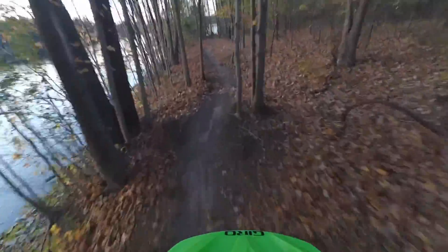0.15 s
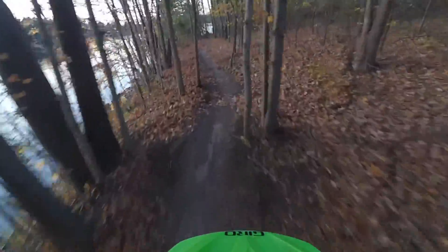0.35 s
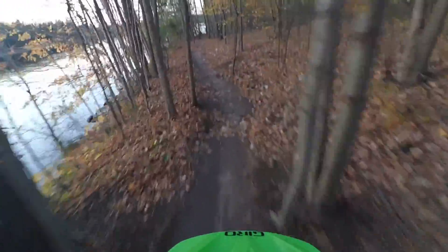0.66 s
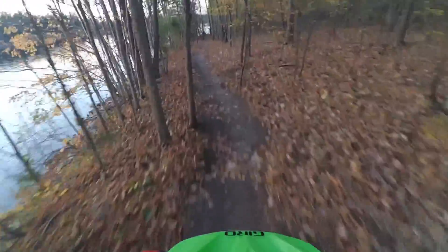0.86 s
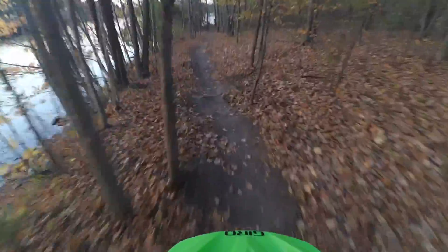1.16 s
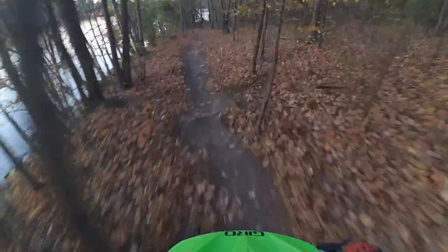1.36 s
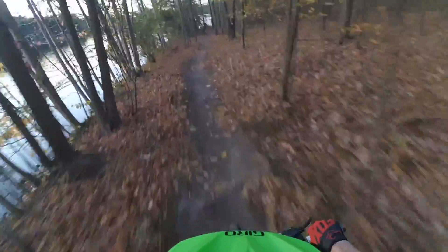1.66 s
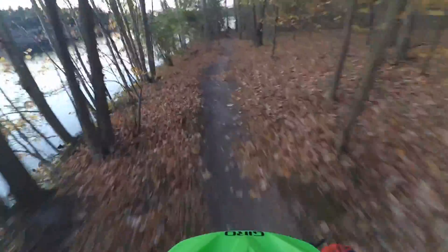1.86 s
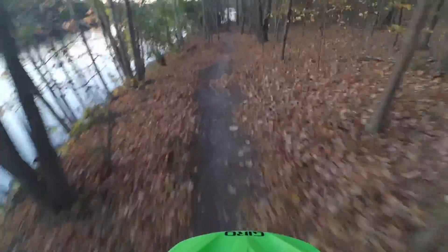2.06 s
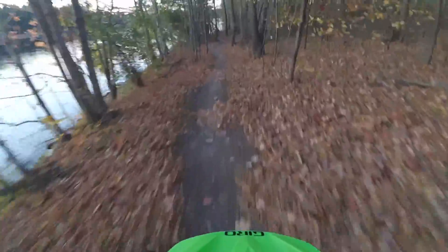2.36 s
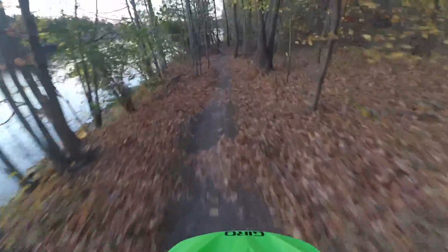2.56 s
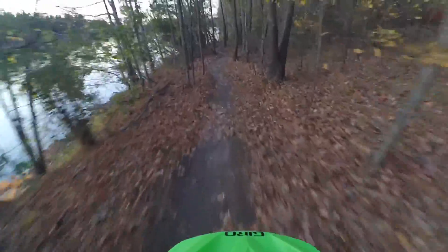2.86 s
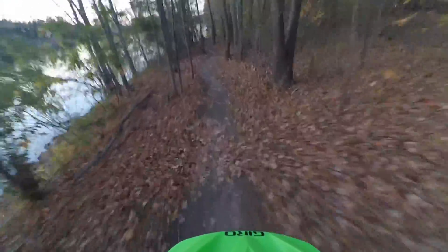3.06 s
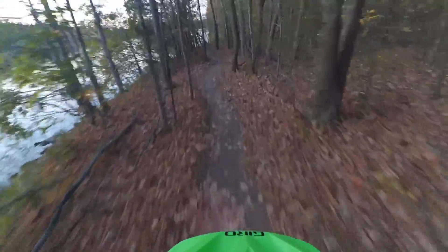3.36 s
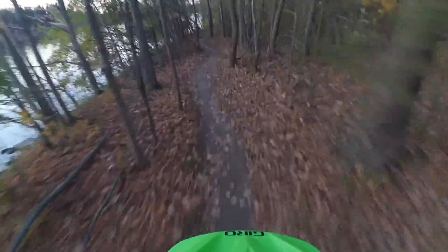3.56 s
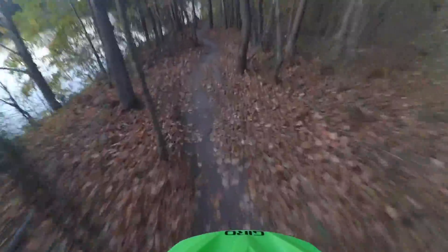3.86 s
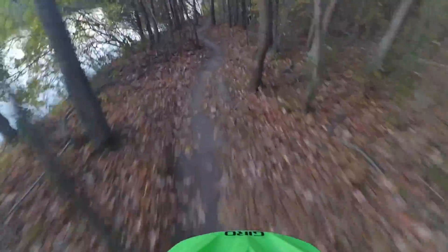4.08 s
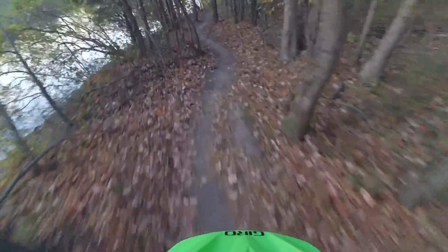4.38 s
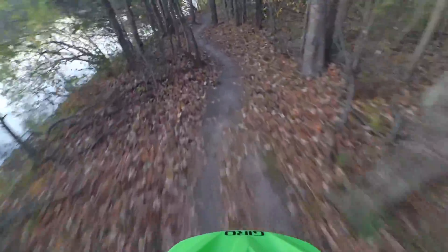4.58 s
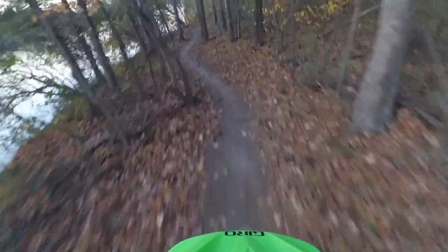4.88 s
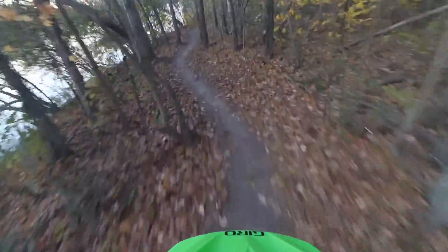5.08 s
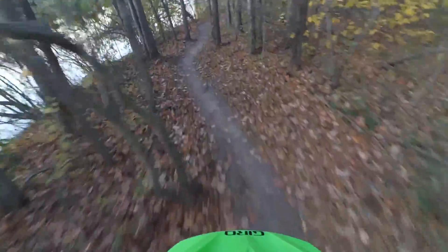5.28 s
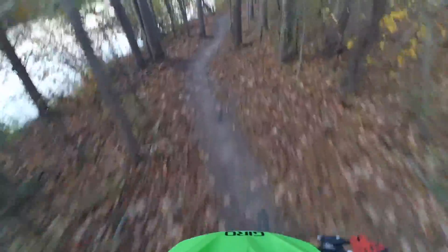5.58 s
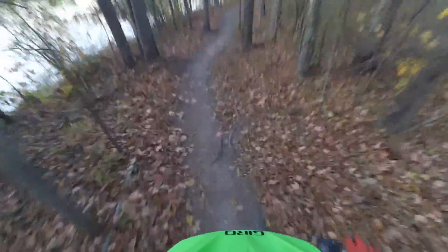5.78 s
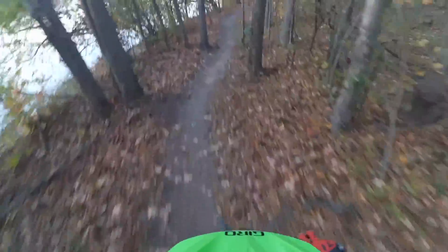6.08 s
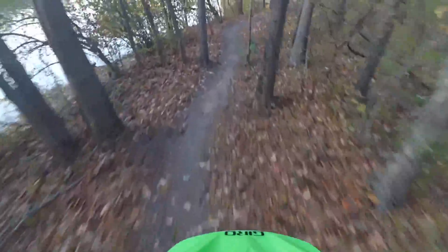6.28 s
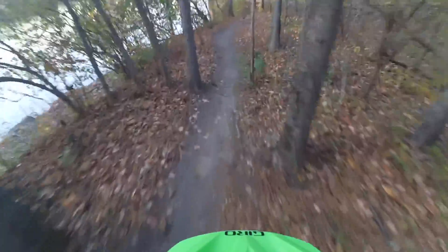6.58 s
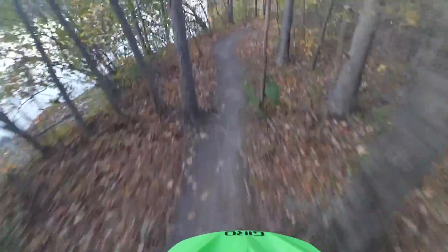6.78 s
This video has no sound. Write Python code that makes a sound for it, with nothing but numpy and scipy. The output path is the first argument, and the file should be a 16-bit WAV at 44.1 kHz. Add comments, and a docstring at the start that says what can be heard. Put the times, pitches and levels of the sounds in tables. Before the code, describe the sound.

A mountain bike rolls fast over a dirt trail, tyres humming and crackling leaves, with rattling bumps, sharp snaps and low wind buffeting the microphone.

```python
"""Knobbly tyres roar and crush dry leaves as a mountain bike runs fast down a dirt trail, heard at the helmet.
Tyres and leaves are filtered noise and tiny cracks; the tyre casings add wavering resonances.
Roots set off short rattles of dull impacts, and sharp snaps are shaped bursts with a faint tail.
Hard bumps push air at the microphone, shake the camera mount with a decaying wobble, and some knock it.
Wind sways and buffets in low filtered noise that grows on rough ground, over a soft even rush of air."""
import sys
import numpy as np
from scipy import signal
from scipy.fft import rfft, irfft, next_fast_len
from scipy.io import wavfile
from scipy.ndimage import uniform_filter1d

SR = 44100
rng = np.random.default_rng(int(sys.argv[2]) if len(sys.argv) > 2 else 0)


def master_out(mix):
    """Clip the mix to full scale and print it as 16-bit PCM to the path in sys.argv[1]."""
    frames = np.transpose(np.atleast_2d(mix))
    ceiling = np.clip(frames, -1, 1)
    pcm = np.round(ceiling * 32767).astype(np.int16)
    wavfile.write(sys.argv[1], SR, pcm)


N = 305613
TIME = np.arange(N) / SR  # s

# rolling, louder with speed and packed ground: start_s [s], rolling_db [dB], rasp_db [dB]
ROLLING = [(0.0, -60, -68), (0.37, -61.5, -69.5), (1.06, -54.5, -62.5), (1.87, -55.5, -63),
           (2.08, -54, -59.5), (2.63, -51.5, -60.5), (3.32, -51.5, -58.5), (3.69, -50.5, -59),
           (4.26, -55, -62.5), (4.44, -58, -64), (4.88, -56, -61.5), (5.36, -62, -64.5),
           (5.85, -59.5, -60.5), (6.06, -66, -69), (6.48, -58.5, -61), (6.93, -68, -70.5)]
# tyre resonances: pitch_hz [Hz], width_hz [Hz], level_db at cruising [dB], slope [dB per dB of rolling]
TYRE_MODES = [(901, 28, -5.5, 1.14), (1193, 96, 0, 1.2), (1348, 50, 3, 1.5), (1584, 120, -14, 0.5)]
# colour of the tyre roar: pitch_hz [Hz], level_db [dB]
ROAR_COLOUR = [(150, -3.5), (300, -11.5), (500, -16.5), (720, -9), (880, -7), (1000, -4.5), (1200, -3),
               (1400, -5.5), (1490, -13), (1640, -4.5), (1900, -22.5), (2300, -22), (5000, -64)]
# colour of the gritty rasp: pitch_hz [Hz], level_db [dB]
RASP_COLOUR = [(1500, -12.5), (2050, -7.5), (2350, 4.5), (2700, 4.5), (2950, -1), (3250, 2.5), (3650, -5),
               (3950, -2.5), (4500, -19), (5100, -14.5), (5600, -13), (6500, -28.5), (10000, -41),
               (16000, -31)]
# drifts of dry leaves: middle_s [s], half_length_s [s], rustle_db [dB]
DRIFTS = [(1.757, 0.14, -84), (2.24, 0.045, -84), (2.95, 0.059, -75), (3.473, 0.1, -79), (4.16, 0.21, -79),
          (4.927, 0.052, -74), (5.33, 0.047, -66.5), (5.567, 0.14, -71.5), (5.867, 0.0078, -57.5),
          (5.934, 0.095, -66.5), (6.061, 0.0072, -59), (6.263, 0.073, -69.5), (6.55, 0.034, -66)]
# colour of the breaking leaves: pitch_hz [Hz], level_db [dB]
LEAF_COLOUR = [(2000, -15), (4000, 7.5), (5600, 6), (7200, 3), (9000, -2), (14500, -8), (16000, -35)]
# rattles and scuffs on rough ground: start_s [s], length_s [s], level_db [dB], treble_lift_db [dB],
# ring_pitch_hz [Hz], ring_db against the chatter [dB]
RATTLES = [(1.568, 0.021, -48.5, -2, 1590, -10), (1.622, 0.018, -44.5, -4.5, 1240, -0.5),
           (1.989, 0.036, -48, -1.5, 1310, -9), (2.038, 0.029, -47.5, -0.5, 1330, -4),
           (2.108, 0.021, -45.5, -10, 1340, -1), (2.15, 0.038, -47.5, -2.5, 1230, -4),
           (2.217, 0.044, -45.5, 2, 1240, -8), (2.57, 0.024, -48, -7, 1120, 4.5),
           (3.093, 0.021, -47, -6, 1670, -1), (3.144, .028, -47, -1.5, 1280, -5),
           (3.201, 0.033, -43.5, 2.5, 1650, -5), (3.587, .023, -48.5, -1, 1330, -8),
           (3.774, 0.046, -51, -0.5, 1320, -16), (3.827, 0.054, -45.5, 0, 1220, -9),
           (3.909, 0.028, -49, -2, 1160, -2), (5.342, 0.015, -52.5, -5, 1240, -1),
           (5.592, 0.029, -49, 0, 1300, -6), (5.633, 0.044, -45, 1.5, 1290, -4),
           (5.691, 0.033, -45.5, -4, 1220, -8.5), (5.818, 0.013, -56, 10, 1640, -8),
           (5.84, 0.029, -45.5, -2, 1240, -3.5), (5.863, .026, -52, -4, 1250, -6),
           (5.9, 0.07, -45.5, 1.5, 1220, -3), (6.003, 0.05, -51.5, 1.5, 1230, -1),
           (6.243, 0.023, -54.5, -5, 1220, -2), (6.443, 0.033, -51, 2.5, 1300, -7),
           (6.472, 0.012, -38.5, 1.5, 1720, -9), (6.506, 0.036, -46, -2, 1150, 0),
           (6.534, 0.041, -45, -0.5, 1230, -2.5)]
# loose parts that ring in a rattle: pitch_hz [Hz], width_hz [Hz], level_db [dB]
LOOSE_PARTS = [(1614, 81, -9.5), (2490, 350, -21), (3810, 230, -10.5)]
# colour of the chatter: pitch_hz [Hz], level_db [dB]
CHATTER_COLOUR = [(240, -43), (450, -7.5), (700, -7), (870, 3), (1050, -3), (1220, 9), (1470, -8.5),
                  (1650, 2), (2050, -6), (2400, 2), (2850, -7.5), (3250, -2), (4000, -12), (4700, -14.5),
                  (6000, -21), (8000, -36), (15000, -36)]
# snaps of twigs and grit against the bike: start_s [s], peak_db [dB], colour_hz [Hz], width_octaves [octaves]
SNAPS = [(1.533, -28, 2640, 0.76), (1.601, -36, 1140, 0.22), (1.719, -57, 5900, .4),
         (1.772, -55, 6000, 0.32), (2.023, -50, 5960, .43), (2.234, -24.5, 2600, 0.82),
         (2.87, -39, 3050, 0.69), (3.028, -33, 2640, 1.2), (3.107, -38, 1800, .28), (3.177, -39, 2600, .4),
         (3.226, -41, 3000, 0.7), (3.231, -48, 3220, .7), (4.25, -50, 6300, 0.36), (5.354, -41, 1250, 0.18),
         (5.851, -40, 3200, 0.45), (5.924, -45, 4200, .9), (5.944, -46, 4350, 0.45), (5.96, -46, 3800, .35),
         (6.029, -48, 3400, .45), (6.059, -48, 6500, 0.39), (6.447, -39, 2600, 0.76),
         (6.479, -43, 3600, 1.4), (6.49, -24.5, 1970, 0.83)]
# bumps in the trail: middle_s [s], push [signed share of full scale], half_length_s [s], shake_db [dB]
BUMPS = [(0.245, -0.17, 0.024, -50), (0.583, -0.25, 0.014, -46), (0.76, 0.41, .016, -40),
         (1.064, -0.093, 0.011, -42), (1.609, -0.48, 0.018, -19.5), (1.98, -0.28, 0.077, -36),
         (2.03, 0.17, 0.0095, -42), (2.084, -0.46, 0.017, -50), (2.213, -0.52, 0.02, -22),
         (2.276, 0.36, 0.012, -54), (2.509, 0.24, 0.014, -45), (3.131, 0.35, 0.012, -27),
         (3.182, -0.56, 0.0084, -14), (3.245, 0.84, 0.016, -36), (3.623, -0.45, .018, -24),
         (3.824, -0.57, 0.016, -15), (3.946, -0.45, 0.015, -25.5), (4.04, 0.24, 0.011, -32),
         (4.128, -0.38, 0.022, -30.5), (4.738, -0.35, .013, -37.5), (5.372, -0.2, 0.017, -26.5),
         (5.631, -0.68, 0.018, -20.5), (5.901, -0.87, 0.013, -13), (6.467, -0.23, 0.0078, -31.5),
         (6.517, -0.82, 0.016, -14.5)]
# colour of the thud in a bump: pitch_hz [Hz], level_db [dB]
THUD_COLOUR = [(30, -6), (48, 0), (80, 0), (100, -15), (125, -31), (175, -34), (330, -45), (1200, -65)]
# dull knocks, mostly of the camera mount, one (3.238 s) as the microphone overloads: start_s [s], level_db
# [dB], pitch_hz [Hz], decay_t60_s [s],
KNOCKS = [(3.175, -30.5, 160, 0.037, -14.5), (3.211, -29, 156, 0.036, -12), (3.238, -30.5, 180, 0.055, -13),
          (5.874, -23.5, 156, 0.014, -14.5), (6.516, -39, 126, 0.042, -23)]
# hollow body of the helmet under a knock: pitch_hz [Hz], level_db [dB]
HELMET_COLOUR = [(70, -20), (130, 1), (210, -6), (320, -10), (650, -16), (1200, -53)]
# gusts and lulls of the headwind: start_s [s], level_db [dB]
GUSTS = [(0.0, 3.5), (0.13, -8.5), (0.26, -1.5), (0.46, -8), (0.6, -4), (0.75, -2.5), (0.87, 2),
         (0.97, -5.5), (1.12, 1.5), (1.35, -3), (1.6, 4), (1.8, -3), (2.1, 1), (2.28, 4), (2.41, -5),
         (2.5, 0), (2.66, -5.5), (2.8, 4), (2.95, 1), (3.06, -1), (3.2, 2), (3.43, -8), (3.6, 5),
         (3.85, -2), (4.03, 1.5), (4.25, 1.5), (4.55, -4.5), (4.78, 0), (5.15, -0.5), (5.35, 1.5),
         (5.47, 0.5), (5.7, -0.5), (6.06, 3.5), (6.2, -3.5), (6.5, -8), (6.68, -5), (6.82, 1.5),
         (6.93, -10)]
# colour of the slow wind sway: pitch_hz [Hz], level_db [dB]
SWAY_COLOUR = [(1, -22), (4, -23), (8, 3), (11, 0.5), (14, -4.5), (20, -16), (26, -22.5), (33, -25.5),
               (50, -50.5), (100, -81), (300, -120)]
# colour of the quicker buffeting: pitch_hz [Hz], level_db [dB]
BUFFET_COLOUR = [(20, -37), (35, -6), (50, 9.5), (62, 10.5), (75, 6), (90, -12), (105, -12), (150, -52),
                 (175, -22), (250, -23), (500, -33.5), (2000, -65)]
# colour of the even rush of air: pitch_hz [Hz], level_db [dB]
AIR_COLOUR = [(100, 25.5), (300, 18), (600, 21.5), (1200, -10.5), (2000, 2.5), (6000, -0.5), (9000, -5.5),
              (11500, -2), (15000, -20), (16000, -25)]

# rolling level of a cruise, the roar and ring there, and how far the roar follows the rolling (dB per dB)
CRUISE_DB, ROAR_DB, RING_DB, ROAR_SLOPE = -55, -56, -63, 0.58
# tyre resonances: pitch climb (share per dB of rolling), pitch waver with the load (share), level flutter
RING_CLIMB, RING_WAVER, RING_FLUTTER_DB = 0.0023, 0.011, 1.5
# stray leaves: level against the rasp, and how unevenly they lie
STRAY_DB, STRAY_PATCHY_DB = -15, 3
# pitch waver of the loose parts as they shift (share)
RATTLE_WAVER = 0.021
# wind before the gusts: level on smooth trail, rise on the roughest ground, reach around a bump
SWAY_DB, SWAY_RISE_DB, SWAY_REACH_S = -21, 14.5, 0.17
BUFFET_DB, BUFFET_RISE_DB, BUFFET_REACH_S = -51, 13, 0.096
AIR_DB = -64
CUT_OFF_HZ = 15300


def gain_of(db):
    """Decibels to amplitude."""
    return 10 ** (np.asarray(db) / 20)


def evened(x):
    """Scales to an rms of 1."""
    return x / np.sqrt(np.mean(x ** 2) + 1e-20)


def coloured(x, points):
    """Filters x by a curve of (Hz, dB) points, at an rms of 1."""
    hz, db = np.transpose(points)
    bins = np.fft.rfftfreq(len(x), 1 / SR)
    response = gain_of(np.interp(np.log(bins + .1), np.log(hz), db))
    return evened(irfft(rfft(x) * response, len(x)))


def noise():
    """White noise for the whole ride."""
    return rng.standard_normal(N)


def wander(rate_hz):
    """Slow random drift up to about a rate, at an rms of 1."""
    size = next_fast_len(N, real=True)
    bins = np.fft.rfftfreq(size, 1 / SR)
    smooth = np.exp(-(bins / rate_hz) ** 2)
    return evened(irfft(rfft(noise(), size) * smooth, size)[:N])


def grains(per_s, spread_db):
    """Random tiny impacts, a few much larger than the rest, at an rms of 1."""
    size = gain_of(spread_db * np.minimum(rng.exponential(1, N), 4))
    struck = rng.random(N) < per_s / SR
    return evened(size * noise() * struck)


def resonate(x, hz, width):
    """One resonance, at a fixed pitch or following a curve, at an rms of 1."""
    turn = np.exp(2j * np.pi * np.cumsum(hz * np.ones(len(x))) / SR)
    r = np.exp(-np.pi * width / SR)
    # shift the pitch down to zero, low-pass there, then shift it back
    return evened((turn * signal.lfilter([1 - r], [1, -r], x / turn)).real)


def add(mix, s, sound):
    """Lays a sound into the mix at a time."""
    part = mix[max(round(s * SR), 0):][:len(sound)]
    part += sound[:len(part)]


def curve(table, column=1):
    """One column of a curve table at every sample."""
    rows = np.array(table)
    return np.interp(TIME, rows[:, 0], rows[:, column])


def swell(s, reach_s):
    """A smooth hump of height 1 around a time."""
    return np.exp(-np.minimum(((TIME - s) / reach_s) ** 2, 50))


def jolting(reach_s, weight=1):
    """How hard the trail throws the rider about: 0 on smooth ground, towards 1 among hard bumps."""
    calm = [1 - min(weight * abs(push), 1) * swell(s, reach_s) for s, push, _, _ in BUMPS]
    return 1 - np.prod(calm, axis=0)


def tyres():
    """Knobs pound packed dirt and ring the casings; uneven ground makes roar and rasp flutter together."""
    ground = wander(rate_hz=27)
    drive_db = curve(ROLLING, column=1) - CRUISE_DB
    stretch = 1 + RING_CLIMB * drive_db + RING_WAVER * wander(rate_hz=9.3)
    roar = coloured(noise(), ROAR_COLOUR) * gain_of(ROAR_DB + ROAR_SLOPE * drive_db)
    for hz, width, db, slope in TYRE_MODES:
        ring = resonate(noise(), hz * stretch, width)
        ring = resonate(ring, hz * stretch, 3 * width)
        flutter_db = RING_FLUTTER_DB * wander(rate_hz=16)
        roar += ring * gain_of(RING_DB + db + slope * drive_db + flutter_db)
    grit = grains(per_s=4000, spread_db=2)
    rasp = coloured(noise() + 0.55 * grit, RASP_COLOUR) * gain_of(curve(ROLLING, column=2))
    # the rasp flutters more deeply than the roar
    return roar * gain_of(0.61 * ground) + rasp * gain_of(0.5 + 1.8 * ground)


def leaves():
    """Dry leaves break under the tread in dense clumps of tiny cracks, loudest in the drifts."""
    cracks = grains(per_s=5000, spread_db=3) * gain_of(2 * wander(rate_hz=70))
    patchy_db = STRAY_PATCHY_DB * wander(rate_hz=22)
    stray = gain_of(curve(ROLLING, column=2) + STRAY_DB + patchy_db)
    drifts = sum(gain_of(db) * swell(s, half_s) for s, half_s, db in DRIFTS)
    return coloured(cracks, LEAF_COLOUR) * (stray + drifts)


def rattles(rise_s=0.0059, fall_s=0.008, tail_t60=0.099, arch_db=6, build_db=3, ring_width=330):
    """Chain, cables and tread chatter in dull impacts that build and stop quickly; each burst has a ring."""
    impacts = grains(per_s=2000, spread_db=1.2)
    chatter = coloured(noise() + impacts, CHATTER_COLOUR)
    stretch = 1 + RATTLE_WAVER * wander(rate_hz=13)
    for hz, width, db in LOOSE_PARTS:
        part = resonate(noise(), hz * stretch, width)
        chatter = chatter + gain_of(db) * resonate(part, hz * stretch, 2 * width)
    chatter = evened(chatter)
    low_pass = signal.butter(2, 1900, fs=SR, output="sos")
    body = signal.sosfiltfilt(low_pass, chatter)
    treble = chatter - body
    # body and treble flicker separately
    body = body * gain_of(1.9 * wander(rate_hz=130))
    treble = treble * gain_of(1.9 * wander(rate_hz=130))

    t, out = np.arange(SR // 6) / SR, np.zeros(N)
    for s, length, db, lift_db, ring_hz, ring_db in RATTLES:
        progress = np.minimum(t / length, 1)
        ring = rng.standard_normal(len(t))
        for width in (ring_width, 2 * ring_width, 2 * ring_width):
            ring = resonate(ring, ring_hz, width)
        # the treble lift peaks in the middle of the burst
        bright = gain_of(lift_db + arch_db * (np.sin(np.pi * progress) - np.pi / 4))
        start = round(s * SR)
        span = slice(start, start + len(t))
        rise = 1 - np.exp(-(t / rise_s) ** 2)
        tail_db = -60 * np.maximum(t - length + fall_s, 0) / tail_t60
        shape = rise * gain_of(build_db * (progress - .5) + tail_db)
        burst = body[span] + bright * treble[span] + gain_of(ring_db) * ring
        add(out, s, gain_of(db) * burst * shape)
    return out


def snaps(crack_t60=0.0064, tail_t60=0.072, tail_db=-25, skirt=1.9, overtone=2.02, overtone_db=-17,
          tick_db=-43, tick_hz=2700, rise_cycles=0.77):
    """A sharp crack with a broad hump of colour, a weaker overtone, a thin bright tick and a short tail."""
    t, out = np.arange(4096) / SR, np.zeros(N)
    bins = np.fft.rfftfreq(len(t), 1 / SR) + 1
    decay = gain_of(-60 * t / crack_t60) + gain_of(tail_db - 60 * t / tail_t60)
    for s, db, hz, octaves in SNAPS:
        burst = rng.choice([-1., 1.], len(t))
        hump = (1 + (np.log2(bins / hz) / octaves) ** 2) ** -skirt
        hump = hump + gain_of(overtone_db) / (1 + (np.log2(bins / hz / overtone) / .15) ** 2)
        attack = 1 - np.exp(-(t * hz / rise_cycles) ** 2)  # duller snaps start more softly
        tick = gain_of(tick_db) * min(hz / tick_hz, 1) ** 4  # and have almost no tick
        crack = irfft(rfft(burst) * (hump + tick)) * attack * decay
        add(out, s - .0004, gain_of(db) * crack / abs(crack).max())
    return out


def bumps(rebound_s=0.0402, mount_hz=57, mount_t60=0.25, thud_db=-11, thud_rise_s=0.11, thud_t60=0.12):
    """The helmet jerks: a sharp push of air between two opposite swells; the mount wobbles and thuds."""
    t, out = np.arange(-SR // 4, SR // 2) / SR, np.zeros(N)
    spread = np.exp(-(t / rebound_s) ** 2)
    swells = spread * (t / rebound_s) ** 4
    after = np.maximum(t + .5 / mount_hz, 0)  # the wobble builds up during the push
    wobble_shape = gain_of(-60 * after / mount_t60) * (1 - np.exp(-(after / 0.013) ** 2))
    wobble = np.cos(2 * np.pi * mount_hz * t) * wobble_shape
    fade = gain_of(-60 * np.maximum(t / thud_t60, -t / thud_rise_s))
    for s, strength, push_s, shake_db in BUMPS:
        jerk = spread / (1 + (t / push_s) ** 2)
        push = jerk - swells * jerk.sum() / swells.sum()  # as much air flows back as was pushed
        thud = coloured(rng.standard_normal(len(t)), THUD_COLOUR) * fade
        shake = np.sign(strength) * wobble + gain_of(thud_db) * thud
        add(out, s + t[0], strength * push + gain_of(shake_db) * shake)
    return out


def knocks(body_t60=0.052):
    """Play in the plastic mount: a damped knock of a few cycles and a hollow thump of the helmet."""
    t, out = np.arange(4000) / SR, np.zeros(N)
    attack = 1 - np.exp(-t / 0.00029)
    for s, db, hz, t60, body_db in KNOCKS:
        mount = gain_of(-60 * t / t60) * np.sin(2 * np.pi * hz * t)
        hollow = coloured(rng.standard_normal(len(t)), HELMET_COLOUR)
        body = gain_of(body_db - 60 * t / body_t60) * hollow
        add(out, s - .001, gain_of(db) * (mount + body) * attack)
    return out


def wind():
    """Slow wind sways the pressure, held down around each bump; quicker wind flutters; gusts swell both."""
    # both layers are levelled over a short window, so that their rise and fall comes from the trail and gusts
    sway = coloured(noise(), SWAY_COLOUR)
    sway /= np.sqrt(uniform_filter1d(sway ** 2, size=7000) + .1)
    buffet = coloured(noise(), BUFFET_COLOUR)
    buffet /= np.sqrt(uniform_filter1d(buffet ** 2, size=3000) + .1)
    held_down = 1 - jolting(.08, weight=1.5)
    sway = sway * held_down * gain_of(SWAY_DB + SWAY_RISE_DB * jolting(SWAY_REACH_S))
    buffet = buffet * gain_of(BUFFET_DB + BUFFET_RISE_DB * jolting(BUFFET_REACH_S))
    edges = signal.windows.tukey(N, .012)  # short fades at both ends
    return (sway + buffet) * gain_of(curve(GUSTS)) * edges


def air():
    """A soft rush of air: steady noise with a fixed colour."""
    return gain_of(AIR_DB) * coloured(noise(), AIR_COLOUR)


def scene():
    """The bike on the trail, the jolts at the helmet, the wind and the air, in one channel."""
    bike = tyres() + leaves() + rattles() + snaps()
    jolts = bumps() + knocks()
    return (bike + jolts + wind() + air())[None]


def record(dry):
    """Clips pushes of air that overload the microphone, then limits the band."""
    clipped = dry / (1 + (dry / .89) ** 60) ** (1 / 60)
    low_pass = signal.firwin(511, CUT_OFF_HZ, window=("kaiser", 9), fs=SR)
    return signal.oaconvolve(clipped, low_pass[None], "same")


dry = scene()
out = record(dry)
master_out(out)
```